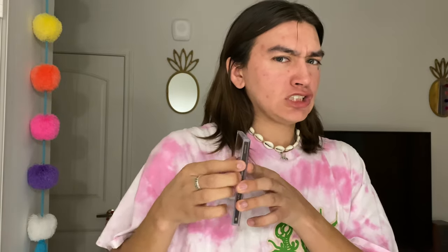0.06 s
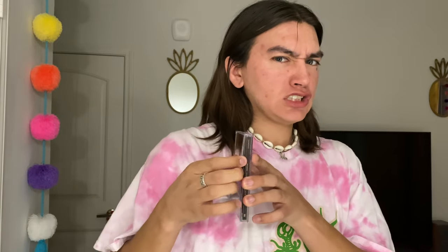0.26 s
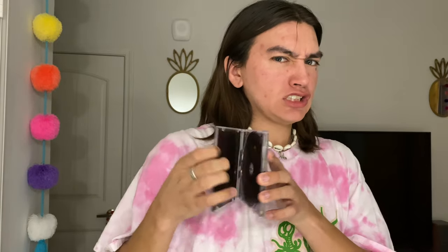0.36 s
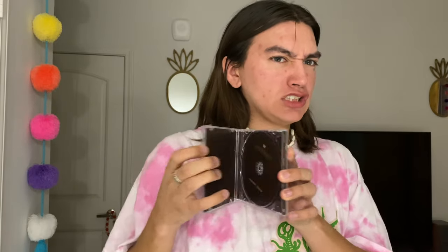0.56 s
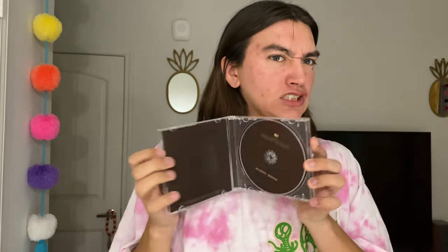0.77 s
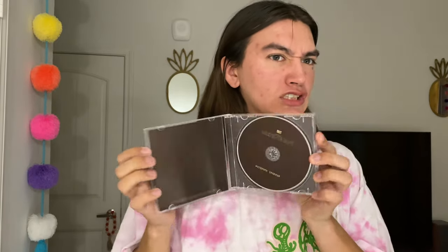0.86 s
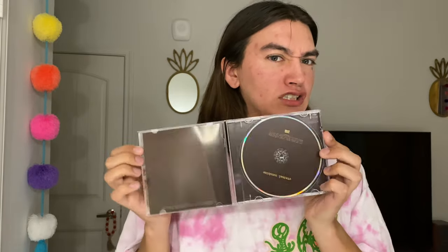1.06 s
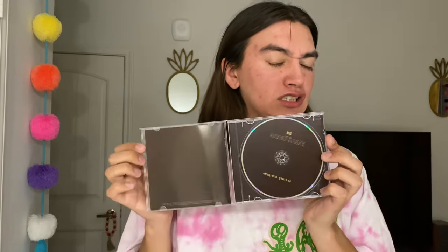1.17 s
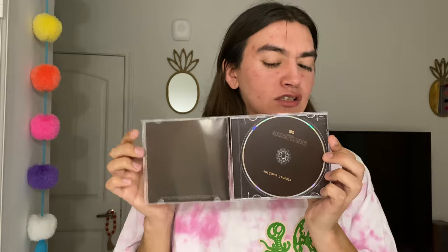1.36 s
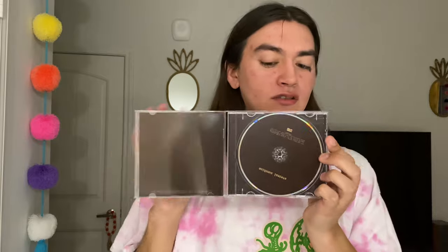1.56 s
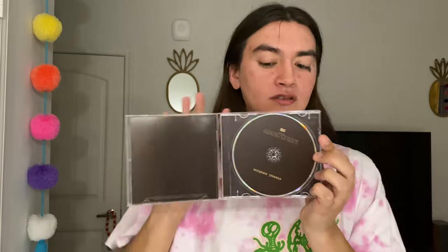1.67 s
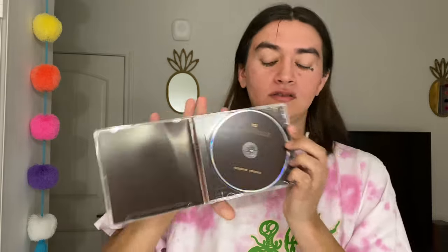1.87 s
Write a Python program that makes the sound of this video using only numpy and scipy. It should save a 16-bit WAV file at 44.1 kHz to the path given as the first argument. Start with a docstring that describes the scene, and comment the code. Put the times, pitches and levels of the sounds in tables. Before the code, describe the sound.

A thin plastic disc case cracks open sharply in two rapid snaps with a brief rattle, then faint ticks and finger rubs follow; close phone microphone in a quiet furnished room with light hiss.

```python
"""Plastic disc case pried open

A thin plastic disc case is pried open close to a phone in a quiet furnished room: the lid catches let go in two cracks,
the panels rattle, then fingers and hinge make faint ticks and rubs. Clicks are short bursts ringing the modes of
the case, the jumping lid adds low damped puffs, and rubs are grainy filtered noise. The room answers with
echoes and a fading tail; room rumble and microphone hiss are shaped noise underneath."""
import sys
import numpy as np
from scipy import signal
from scipy.fft import rfft, irfft, next_fast_len
from scipy.io import wavfile
from scipy.ndimage import map_coordinates

SR = 44100
rng = np.random.default_rng(int(sys.argv[2]) if len(sys.argv) > 2 else 0)


def to_wav(s):
    """Save 16-bit WAV."""
    ch = np.atleast_2d(s).T  # columns
    pcm = np.round(np.clip(ch, -1, 1) * 32767)  # PCM
    wavfile.write(sys.argv[1], SR, pcm.astype(np.int16))


def ratio_of_db(decibels):
    """Turn decibels (scalar or array-like) into linear amplitude factors; 0 dB maps to 1."""
    return 10 ** (np.asarray(decibels, float) / 20)


N = 83790  # length in samples: 1.9 s
ROOM_DB = -5.5  # room tail for the cracks, puffs and rubs


def unit(x):
    """Scales a sound to rms 1."""
    return x / np.sqrt(np.mean(x ** 2) + 1e-20)


def along(points, hz):
    """Reads (frequency [Hz], value) points on a log frequency axis."""
    point_hz, value = np.transpose(points)
    return np.interp(np.log(hz + 1), np.log(point_hz + 1), value)


def filtered(x, response):
    """Multiplies the spectrum of a sound by a function of frequency."""
    size = next_fast_len(len(x) + 8192)
    spectrum = rfft(x, size) * response(np.fft.rfftfreq(size, 1 / SR))
    return irfft(spectrum, size)[:len(x)]


def hump(hz, centre_hz, octaves):
    """A bell-shaped gain on a log frequency axis."""
    distance = np.log2((hz + 1) / centre_hz) / max(octaves, .1)
    return np.exp(-.5 * distance ** 2)


def even(x):
    """Flattens the chance peaks and dips in the spectrum of a burst."""
    spectrum = rfft(x)
    size = np.abs(spectrum)
    return irfft(spectrum / (size + .3 * size.mean()), len(x))


def cracks():
    """The catches let go and the lid rattles: loud clicks that ring freely."""
    # (time [s], click peak [dB], brightest frequency [Hz], spread [octaves], time scale of the slip [s])
    releases = [(.2006, -26.5, 3960, 0.94, 0.00042), (.2026, -10, 2170, 0.6, 0.0013),
                (.2030, -12.5, 7000, 0.67, 0.0011), (.2142, -27.5, 7000, 0.75, .0006),
                (.2208, -21, 5800, 1.0, .002), (.2228, -12.5, 5200, .95, .0016),
                (.2254, -2.5, 4300, .65, .0012), (.2284, -7.5, 2700, .9, .001),
                (.2316, -24, 11000, .5, .0006), (.2300, -8, 4600, 0.88, 0.0017),
                (.2398, -42, 6000, 1.33, 0.00068), (.2445, -19, 3884, 0.62, 0.0013),
                (.2525, -18, 4500, 1.1, 0.00079)]
    return clicks(releases, 1, ROOM_DB)


def ticks():
    """Faint clicks of the handled case, whose ringing the grip shortens."""
    # (time [s], click peak [dB], brightest frequency [Hz], spread [octaves], time scale of the slip [s])
    small_slips = [(.0245, -47.5, 1210, 0.31, 0.0024), (.072, -50.5, 3280, 1.1, 0.0024),
                   (.1675, -35, 3800, 0.73, 0.0019), (.531, -42.5, 1210, 0.4, 0.00068),
                   (.608, -34, 1405, 0.65, 0.00035), (.8822, -37, 2140, 0.62, 0.0012),
                   (.9068, -41.5, 2080, 0.57, 0.00047), (.9648, -36, 724, 0.37, 0.0024),
                   (.9652, -25, 1540, 0.6, 0.00068), (.9658, -28.5, 2870, 0.44, 0.0027),
                   (.9655, -32.5, 8000, .7, .001), (.9865, -39, 9000, 1.1, 0.0014),
                   (.991, -40, 1760, 0.21, 0.0011), (.9985, -40.5, 3500, 0.46, 0.0017),
                   (1.0232, -38.5, 1940, 0.15, 0.0012), (1.0462, -31.5, 1480, .7, 0.0001),
                   (1.0935, -36.5, 1400, 0.6, .0003), (1.2252, -41.5, 2770, 0.23, 0.00045),
                   (1.4008, -40.5, 2160, 0.49, 0.0016), (1.7437, -30.5, 2180, 0.46, 0.0011),
                   (1.7995, -40.5, 1880, 0.26, 0.0034), (1.8078, -39, 2310, 0.82, 0.00163),
                   (1.810, -40.5, 1100, 0.49, 0.0041), (1.8225, -65, 3500, 0.69, .0006),
                   (1.832, -44, 2500, 0.24, .001), (1.8475, -46, 2500, 0.39, 0.0011),
                   (1.8475, -45, 11500, .25, 0.00052), (1.8525, -42.5, 11500, 0.24, .0006),
                   (1.863, -49, 2900, 0.2, 0.002), (1.879, -47.5, 2480, .6, 0.0014)]
    return clicks(small_slips, .6, -17.5)


def clicks(rows, ring_scale, room_db):
    """A sharp release plus a rough slip rings the modes near its own brightness, and the room answers."""
    # modes of the case: (frequency [Hz], level before each click's own brightness [dB])
    modes = [(684, 48), (1000, -41), (1280, 32), (1640, 39.5), (2030, -46), (2390, -32), (2850, 32),
             (3250, 4), (3650, 30), (4260, -22), (4650, 16.5), (5100, -24), (5500, 27.5), (6340, 29),
             (7100, 7), (8300, -12), (9500, 6), (10800, 31), (12500, -16)]
    mode_scatter_db, detune = 1.5, .015  # random spread of mode level, and of pitch as a fraction
    out = np.zeros(N + SR)
    t = np.arange(SR // 20) / SR
    hz, level_db = np.transpose(modes)[:, :, None]
    # higher modes die sooner: t60 is the time to fall by 60 dB, in seconds
    t60 = ring_scale * .03 * (hz / 1000) ** -.4
    sign = (-1) ** np.arange(len(modes))[:, None]
    for s, peak_db, centre_hz, octaves, slip_s in rows:
        def bell(f):
            return hump(f, centre_hz, octaves)

        # the longer the slip, the more its rough part outweighs the sharp release
        u = t / max(slip_s, 1e-4)
        rough = rng.standard_normal(len(t)) * np.sqrt(u) * np.exp(-u)
        slip = (t == 0) + slip_s / .0006 * rough / np.linalg.norm(rough)
        slip = even(slip) * np.exp(-u / 4)

        # the modes answer the slip
        level_chance, pitch_chance = rng.standard_normal((2, len(modes), 1))
        gain = ratio_of_db(level_db + mode_scatter_db * level_chance) * bell(hz) * sign
        wave = np.sin(2 * np.pi * hz * (1 + detune * pitch_chance) * t)
        ring = np.sum(gain * ratio_of_db(-60 * t / t60) * wave, axis=0)
        rung = signal.fftconvolve(slip, ring)[:len(t)]

        # the slip is also heard bare, 3 dB above the ringing before both are scaled to the peak
        bare = filtered(np.pad(slip, (16, 0)), lambda f: 1j * bell(f))[:len(t)]
        click = rung / np.linalg.norm(rung) + ratio_of_db(3) * bare / np.linalg.norm(bare)
        click = ratio_of_db(peak_db) * click / np.abs(click).max()

        # the room hears all directions, with the modes blended into one smooth pulse
        spread = filtered(1.0 * (np.arange(len(t)) == 16), bell)
        wet = ratio_of_db(room_db) * room(spread * np.linalg.norm(click) / np.linalg.norm(spread))
        start = round(s * SR)
        out[start:][:len(t)] += click
        out[start:][:len(wet)] += wet
    return out[:N]


def pushes():
    """The lid pushes air as it jumps: each puff is a low, quickly damped sine."""
    # (time [s], level before damping [dB], frequency [Hz], damping time to 1/e [cycles])
    puffs = [(0.1999, -25, 212, 1.1), (0.2215, -22, 327.7, 0.97), (0.963, -45, 312, 1)]
    t, out = np.arange(N) / SR, np.zeros(N)
    for s, db, hz, cycles in puffs:
        turns = np.maximum(t - s, 0) * hz
        out += ratio_of_db(db) * np.sin(2 * np.pi * turns) * np.exp(-turns / cycles)
    return out


def rubs():
    """Fingers slide on the plastic: grainy friction noise under a soft swell for each slide."""
    # (middle [s], rms before the swell [dB], half length [s], brightest frequency [Hz], spread [octaves])
    slides = [(0.084, -62.5, 0.011, 1790, 0.91), (0.184, -59.5, 0.01, 4300, 0.88),
              (0.379, -57.5, 0.09, 4740, .9), (0.504, -60, .008, 7730, 0.88),
              (0.523, -54.5, 0.0066, 1840, .6), (0.647, -58.5, .012, 4000, 0.62),
              (0.933, -62.5, .03, 3280, 0.88), (0.972, -53.5, 0.019, 3500, 0.75),
              (1.05, -104, 0.031, 2400, 0.74), (1.411, -61, 0.0065, 3200, .7), (1.744, -56, 0.013, 3260, 1),
              (1.84, -60.5, 0.043, 3560, 0.88)]
    grain_hz, grain_db = 400, 2.5  # random level points per second, and their spread in dB
    t, out = np.arange(N) / SR, np.zeros(N)
    for s, db, half_s, centre_hz, octaves in slides:
        grain = map_coordinates(rng.standard_normal(1000), [t * grain_hz], mode="wrap")
        noise = filtered(rng.standard_normal(N), lambda f: hump(f, centre_hz, octaves))
        swell = np.exp(-.5 * ((t - s) / half_s) ** 2)
        out += ratio_of_db(db) * unit(noise * ratio_of_db(grain_db * grain)) * swell
    return out


def room(x):
    """Diffuse answer of the room: a noise tail in which each frequency dies at its own speed."""
    # (frequency [Hz], time to fall by 60 dB [s])
    fade_times = [(150, 0.13), (600, .3), (1500, 0.34), (4000, 0.29), (8000, 0.3), (15000, 0.098)]
    # (frequency [Hz], relative level at the start of the tail [dB])
    colour = [(100, -47), (600, 10.5), (1500, 3.5), (3000, -3.5), (5000, -3), (7500, -10.5), (11000, -4.5),
              (15000, -3)]
    delay_s, rise_s = .0028, .00296
    hz, t, z = signal.stft(rng.standard_normal(SR // 2), SR, nperseg=256)
    level_db = along(colour, hz)[:, None] - 60 * t / along(fade_times, hz)[:, None]
    tail = signal.istft(z * ratio_of_db(level_db), SR, nperseg=256)[1]
    tail = tail * (1 - np.exp(-np.arange(len(tail)) / SR / rise_s))
    delayed = np.pad(x, (round(delay_s * SR), 0))
    return signal.fftconvolve(delayed, tail / np.linalg.norm(tail))[:N]


def walls(x):
    """Near surfaces return a few early echoes: delayed, quieter copies."""
    # (delay [s], level [dB])
    echoes = [(.0068, -16.5), (.0087, -29), (0.024, -26.5), (.027, -22)]
    return sum(ratio_of_db(db) * np.pad(x, (round(s * SR), 0))[:N] for s, db in echoes)


def microphone(x):
    """The microphone loses treble: a gain that falls with frequency."""
    # (frequency [Hz], gain [dB])
    treble_loss = [(20, 0), (7000, 0), (11000, -3), (14000, -8), (15800, -13), (16000, -60)]
    return filtered(x, lambda hz: ratio_of_db(along(treble_loss, hz)))


def hush():
    """Room rumble and microphone hiss: steady noise, strongest in the bass and cut off at 15900 Hz."""
    # (frequency [Hz], relative level [dB])
    noise_colour = [(12, -20), (20, -1), (83, -6.5), (624, -20.5), (718, -21.5), (1440, -28), (1810, -25.5),
                    (2080, -29.5), (5850, -34), (14300, -39), (16000, -40.5)]
    noise = filtered(rng.standard_normal(N), lambda hz: ratio_of_db(along(noise_colour, hz)) * (hz < 15900))
    return ratio_of_db(-52.5) * unit(noise)


def scene():
    """The case, its echoes in the room, and the background."""
    soft = pushes() + rubs()
    case = cracks() + ticks() + soft + ratio_of_db(ROOM_DB) * room(soft)
    heard = microphone(case + walls(case))
    return (heard + hush())[None]


def low_pass(x):
    """Removes everything above the highest recorded frequency."""
    return signal.sosfilt(signal.butter(12, 16510, fs=SR, output="sos"), x)


def record(dry):
    """The finished mix as the phone gives it out."""
    return low_pass(dry)


dry = scene()
out = record(dry)
to_wav(out)
```